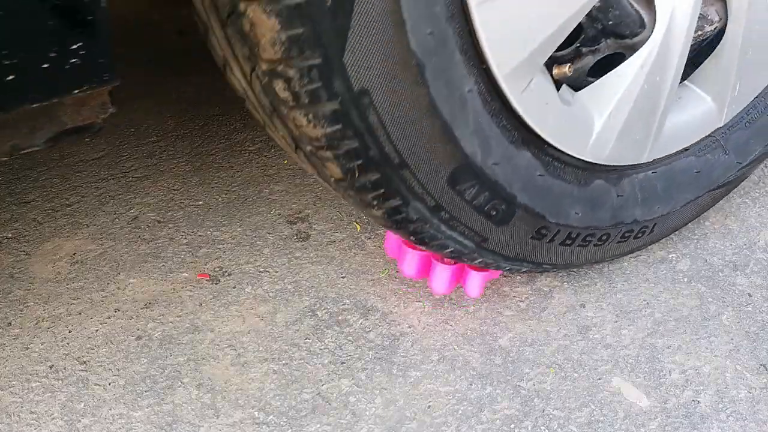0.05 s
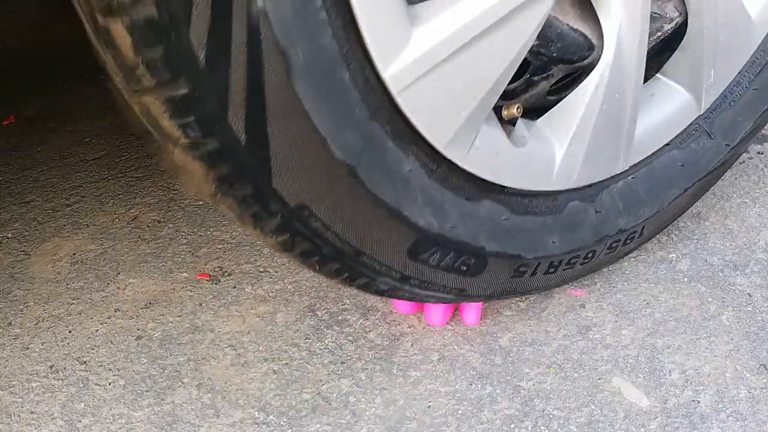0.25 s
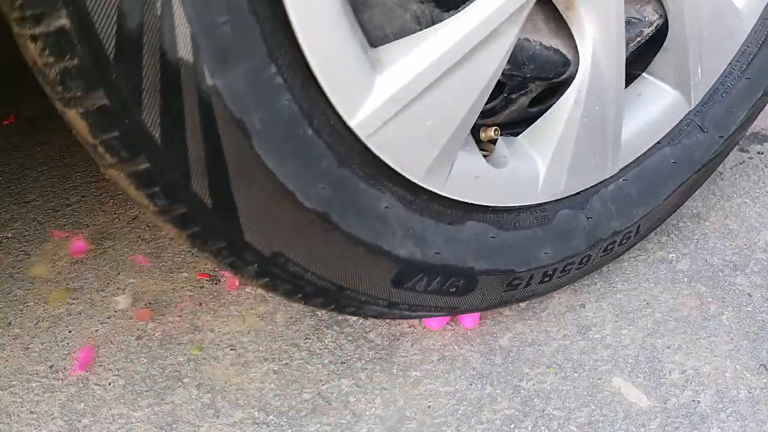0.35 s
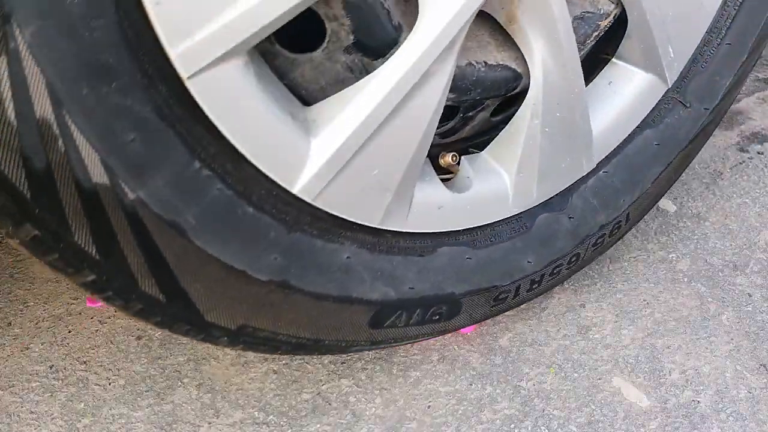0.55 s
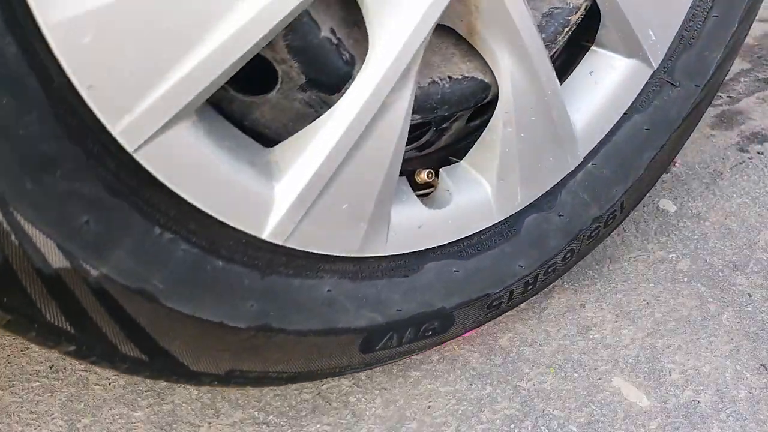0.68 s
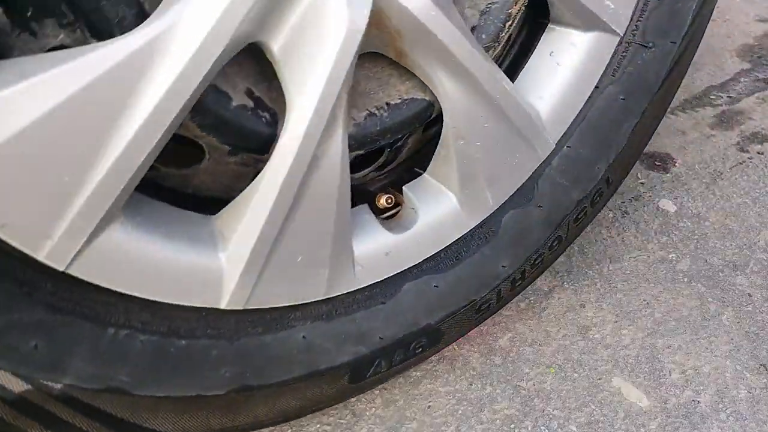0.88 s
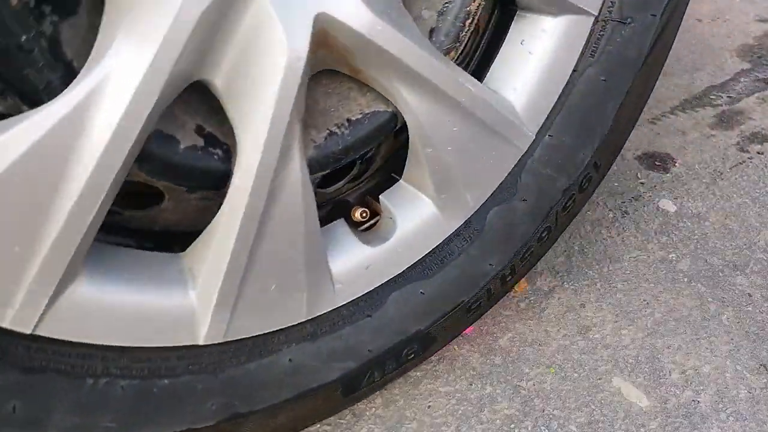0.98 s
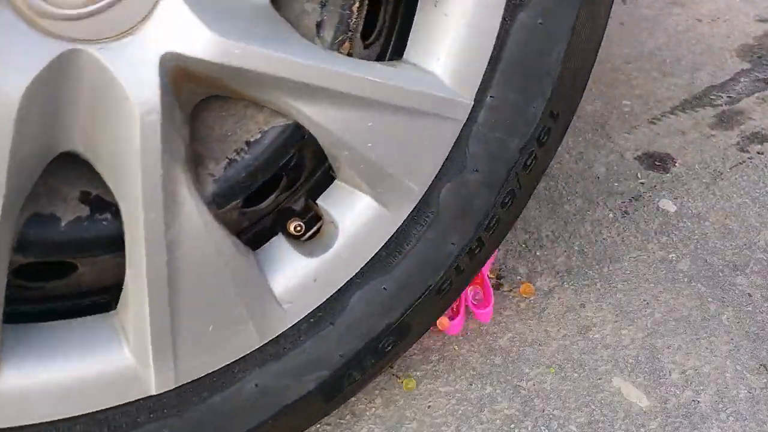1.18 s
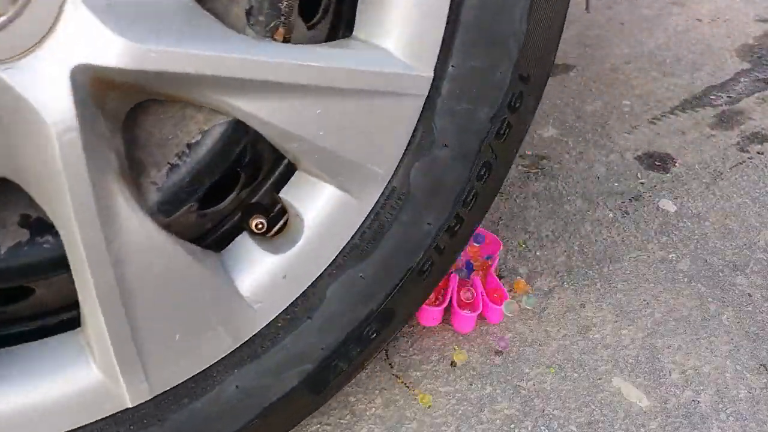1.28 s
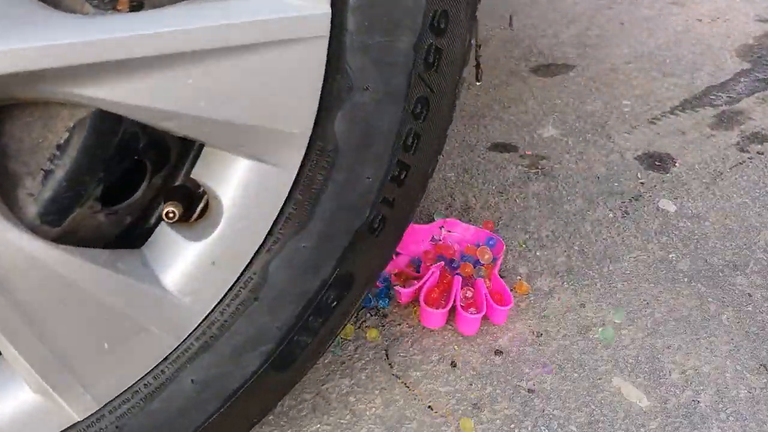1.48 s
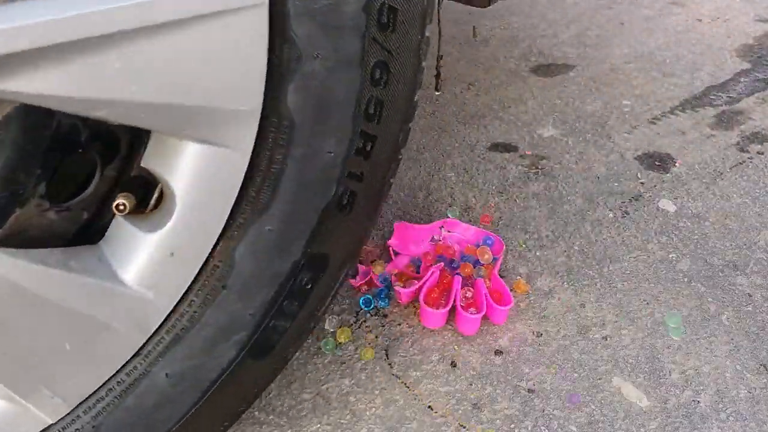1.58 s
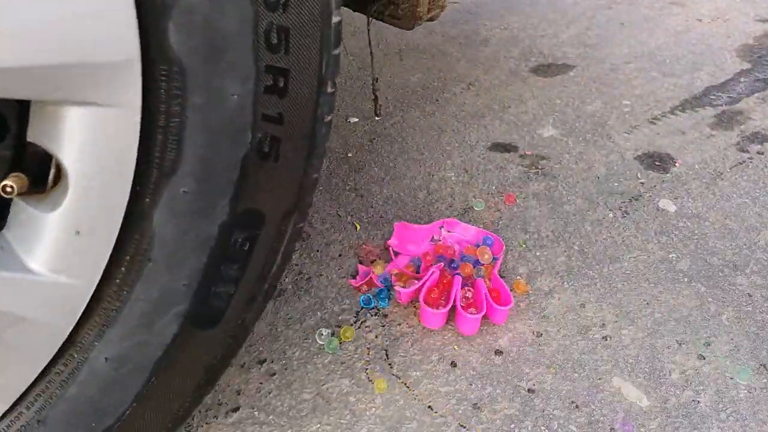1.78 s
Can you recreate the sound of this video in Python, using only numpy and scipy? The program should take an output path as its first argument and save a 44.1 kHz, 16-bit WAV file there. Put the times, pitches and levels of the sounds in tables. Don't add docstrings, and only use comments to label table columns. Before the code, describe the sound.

A car tyre crushes a brittle hollow plastic toy on concrete with loud cracks and snaps

```python
import sys
import numpy as np
from scipy import signal
from scipy.io import wavfile

SR = 44100
rng = np.random.default_rng(int(sys.argv[2]) if len(sys.argv) > 2 else 0)


def field_ratio(decibels):
    return 10 ** (np.asarray(decibels, dtype=float) / 20)


def unload_wav(signal):
    wavfile.write(
        sys.argv[1],
        SR,
        np.round(np.clip(np.atleast_2d(signal).T, -1, 1) * 32767).astype(np.int16),
    )


N = 81585

# (time [s], peak [dB], shard pitch [Hz], rattle [dB], sizzle [dB])
CRUSH_SNAPS = [(0.0716, -10.5, 1700, -21, -35), (0.2303, -2, 3100, -11, -10), (0.2449, -7, 2500, -6, -15),
               (0.2762, -6, 2730, -17, -19), (.2830, -6, 3270, -30.5, -15.5), (0.3113, -17, 3900, -25, -16),
               (0.3197, -14, 2740, -18, -32), (0.3535, -26.5, 3430, -6.5, -26),
               (.4165, -2.5, 3300, -9.5, -18), (0.424, -9.5, 2500, -15, -11),
               (0.5009, -6.5, 4470, -21.5, -7.5), (0.5887, -23, 6400, -19, -19),
               (0.6073, -5, 2440, -16, -12.5)]
# (time [s], peak [dB], shard pitch [Hz], rattle [dB], sizzle [dB])
SPLINTER_SNAPS = [(0.7502, -37.5, 4030, -14, -15), (0.7801, -37.5, 3130, -21, -22),
                  (0.8371, -21.5, 3620, -22.5, -16), (0.8816, -39, 1460, -16, -12),
                  (0.8951, -33.5, 1830, -17, -10), (0.9268, -30, 1360, -11, -16),
                  (0.9313, -20.5, 1700, -20.5, -25), (1.027, -15, 3700, -15.5, -11.5),
                  (1.0416, -36, 2700, -17, -25), (1.07, -38, 2750, -17, -30),
                  (1.0894, -39.5, 3450, -27, -24), (1.1128, -47, 1900, -2.5, -18),
                  (1.1919, -47.5, 2730, -4, -22), (1.2303, -34, 4610, -26, -24),
                  (1.2377, -38.5, 2330, -18, -28), (1.246, -37.5, 2560, -15, -27),
                  (1.3598, -51.5, 3970, -11, -19), (1.5576, -47, 3710, -16, -19)]
# (time [s], peak [dB], pitch [Hz], rattle [dB])
SHELL_KNOCKS = [(.231, -5.5, 580, -30), (.246, -8, 640, -35), (.320, 0.5, 704, -14),
                (.411, -23.5, 558, -29), (0.4171, 0, 730, -11), (.424, -7, 806, -6.5),
                (.5015, -26, 1110, -8), (0.588, -24.5, 1080, -12), (0.6079, -4.5, 908, -16.5),
                (.9268, -33, 1190, -16), (0.9307, -27, 1580, -14), (.937, -43, 960, -24),
                (1.0267, -15.5, 766, -9), (1.042, -36, 600, -18), (1.193, -43.5, 950, -8)]
# (time [s], hold [s], bright level [dB], hollow level [dB], T60 [s])
COLLAPSES = [
    (0.2303, 0.018, -14, -20, 0.11),
    (0.257, 0.006, -20.5, -20.5, 0.31),
    (0.357, 0.012, -36.5, -62, 0.27),
    (0.4186, 0.015, -24.5, -18, 0.13),
    (1.066, 0.032, -53.5, -61, .1),
    (1.208, 0.043, -55.5, -75, .1),
]
# (frequency [Hz], density [dB per Hz])
FRACTURE_SPECTRUM = [(200, -25), (330, -0.5), (700, -9.5), (1500, 0.5), (3700, -3), (6000, -13),
                     (9000, -19.5), (16000, -35)]
# (frequency [Hz], level [dB], T60 [s])
SHELL_MODES = [(476, -0.5, 0.022), (640, -0.5, 0.016), (760, -7, 0.016), (905, 1.5, .02)]
# (time [s], air ring [dB], carcass thud [dB])
TYRE_JOLTS = [
    (0.063, -30, -37),
    (0.233, -23, -22.5),
    (0.249, -29, -23),
    (0.2594, -6, -12),
    (0.2739, -8, -21.5),
    (.420, -31.5, -24),
    (.4435, -17, -24.5),
]
# (frequency [Hz], level [dB], T60 [s])
AIR_RING_MODES = [(227, -2.5, 0.54), (458.5, -20, .3)]
# (frequency [Hz], level [dB], T60 [s])
CARCASS_MODES = [(65, -9, 0.04), (119, -9.5, .1), (152, 4, 0.065)]
# (time [s], grit [dB], rumble [dB])
ROLL_LEVELS = [(0.0, -34.5, -29.5), (0.18, -38, -32.5), (0.35, -39.5, -29.5), (0.422, -41, -30),
               (0.534, -45.5, -40), (0.628, -46.5, -40), (0.73, -54, -44), (0.936, -58, -47),
               (1.282, -61, -48.5), (1.478, -60.5, -48.5), (1.85, -56.5, -49.5)]
# (frequency [Hz], density [dB per Hz])
GRIT_SPECTRUM = [(200, -23), (330, -2.5), (700, -1), (1200, -6), (3600, -6), (5500, -12.5), (8000, -31),
                 (16000, -35)]
# (frequency [Hz], density [dB per Hz])
RUMBLE_SPECTRUM = [(22, -7), (38, -12), (52, -16), (66, 5), (130, 0.5), (240, -4), (280, -15.5),
                   (400, -28.5)]
# (frequency [Hz], width [Hz], share [1])
PORT_BANDS = [(5000, 2600, .45), (14200, 4600, .4)]


def rms_one(x):
    return x / np.sqrt(np.mean(x ** 2) + 1e-20)


def top_one(x):
    return x / np.max(np.abs(x))


def drift(rate_hz):
    return np.interp(np.arange(N) * rate_hz / SR, np.arange(400), rng.standard_normal(400))


def band(x, low_hz, high_hz):
    edges_hz = [low_hz, min(high_hz, 0.45 * SR)]
    return signal.sosfilt(signal.butter(2, edges_hz, "band", fs=SR, output="sos"), x)


def ring(clicks, hz, t60_s):
    r, w = field_ratio(-60 / (t60_s * SR)), 2 * np.pi * hz / SR
    return signal.lfilter([0, np.sin(w)], [1, -2 * r * np.cos(w), r * r], clicks + 1e-18)


def grains(per_s, spread_db):
    hits = rng.random(N) < per_s / SR
    size = field_ratio(spread_db * np.minimum(rng.exponential(1, N), 4))
    return hits * size * rng.choice([-1, 1], N)


def coloured(x, spectrum, patchy_db, tilt_db=0):
    hz, db = np.transpose(spectrum)
    edges_hz = hz[0] * 2 ** np.arange(0, np.log2(hz[-1] / hz[0]) + 0.2, 1 / 3)
    out = 0
    for k, (low_hz, high_hz) in enumerate(zip(edges_hz, edges_hz[1:])):
        mid_hz = np.sqrt(low_hz * high_hz)
        gain_db = np.interp(np.log(mid_hz), np.log(hz), db) + patchy_db * drift(18)
        gain_db = gain_db + tilt_db * max(0, min(0.6, np.log2(mid_hz / 7500)))
        settled = band(np.tile(x[k % len(x)], 2), low_hz, high_hz)[N:]
        out = out + field_ratio(gain_db) * settled
    return rms_one(out)


def snaps():
    crack_s, arrival_s, rise_s = 0.0005, 0.0009, 0.00067
    shard_t60_s, rattle_t60_s, sizzle_t60_s = 0.006, 0.066, 0.036
    out, t = np.zeros(N + SR), np.arange(SR // 6) / SR
    for s, peak_db, hz, rattle_db, sizzle_db in CRUSH_SNAPS + SPLINTER_SNAPS:
        white, tail = rng.standard_normal((2, len(t)))
        white[0] = -7.0
        crack = white * np.exp(-t / crack_s)
        late = field_ratio(rattle_db) * np.minimum(t / rise_s, 1)
        age_s = t * (hz / 2500) ** 0.59

        body = top_one(band(band(crack, hz / 2.6, hz * 1.69), hz / 2.6, hz * 3.1))
        shard = top_one(body + 0.5 * top_one(ring(crack, hz, shard_t60_s)))
        rattle = rms_one(band(tail, hz / 2.01, hz * 1.99))
        shard += rattle * late * field_ratio(-60 * age_s / rattle_t60_s)

        sizzle_tail = rms_one(band(tail, 4200, 14000)) * late
        sizzle_tail *= field_ratio(-6.5 - 60 * age_s / sizzle_t60_s)
        sizzle = top_one(band(crack, 4600, 16500)) + sizzle_tail

        i = int((s + arrival_s) * SR)
        out[i:i + len(t)] += field_ratio(peak_db) * (shard + field_ratio(sizzle_db + 11) * sizzle)
    return out[:N]


def knocks():
    knock_t60_s, rattle_t60_s, rise_s, trim_db = 0.0074, 0.08, 0.009, -1
    out, t = np.zeros(N + SR), np.arange(SR // 6) / SR
    pull = band(np.exp(-((t - 0.0005) / 0.00015) ** 2), 330, 4000)
    for s, peak_db, hz, rattle_db in SHELL_KNOCKS:
        rattle = rms_one(band(rng.standard_normal(len(t)), 440, 1300))
        rattle *= np.minimum(t / rise_s, 1) * field_ratio(rattle_db - 60 * t / rattle_t60_s)
        i = int(s * SR)
        out[i:i + len(t)] += field_ratio(peak_db + trim_db) * (top_one(ring(pull, hz, knock_t60_s)) + rattle)
    return out[:N]


def crunches():
    t = np.arange(N) / SR
    breaks = grains(per_s=6000, spread_db=3.5)
    bright = coloured(breaks * rng.choice([-1, 1], (2, N)), FRACTURE_SPECTRUM, patchy_db=2.0)
    hollow = rms_one(sum(field_ratio(db) * ring(grains(5000, 2.2), hz, t60_s) for hz, db, t60_s in SHELL_MODES))
    out = 0
    for s, hold_s, bright_db, hollow_db, t60_s in COLLAPSES:
        shape = (t >= s) * field_ratio(-60 * np.clip(t - s - hold_s, 0, 1) / t60_s)
        out = out + shape * (field_ratio(bright_db) * bright + field_ratio(hollow_db) * hollow)
    return out


def tyre():
    out = 0
    for column, modes in ((1, AIR_RING_MODES), (2, CARCASS_MODES)):
        clicks = np.zeros(N)
        for jolt in TYRE_JOLTS:
            clicks[int(jolt[0] * SR)] = field_ratio(jolt[column])
        out = out + sum(field_ratio(db) * ring(clicks, hz, t60_s) for hz, db, t60_s in modes)
    soft = np.hanning(40)
    return signal.lfilter(soft / soft.sum(), 1, out)


def rolling():
    time_s, *levels_db = np.transpose(ROLL_LEVELS)
    grit_db, rumble_db = [np.interp(np.arange(N) / SR, time_s, db) for db in levels_db]
    bed = rng.standard_normal((2, N)) + field_ratio(-6.5) * rms_one(grains(per_s=1600, spread_db=4.7))
    tilt_db = 0.41 * (grit_db - grit_db.min())
    grit = coloured(bed, GRIT_SPECTRUM, patchy_db=1.5, tilt_db=tilt_db)
    grit = signal.sosfilt(signal.cheby2(10, 40, 16400, fs=SR, output="sos"), grit)
    rumble = coloured(rng.standard_normal((2, N)), RUMBLE_SPECTRUM, patchy_db=1.5)
    return field_ratio(grit_db + 0.5 + 0.86 * drift(25)) * grit + field_ratio(rumble_db - 2.5) * rumble


def scene():
    return np.tile(snaps() + knocks() + crunches() + tyre() + rolling(), (2, 1))


def low_pass(x):
    return signal.sosfilt(signal.butter(12, 16860, fs=SR, output="sos"), x)


def record(dry):
    bass_cut_hz, top_cut_hz = 26, 16900
    x = dry + field_ratio(-2.5) * band(dry, 12000, 15100)
    x = np.tanh(x)
    x = signal.sosfilt(signal.butter(2, bass_cut_hz, "high", fs=SR, output="sos"), x)
    uneven = sum(share * band(x[0], hz - width_hz / 2, hz + width_hz / 2) for hz, width_hz, share in PORT_BANDS)
    x = x + uneven * [[-0.5], [0.5]]
    mix = signal.sosfilt(signal.cheby2(12, 60, top_cut_hz, fs=SR, output="sos"), x)
    return low_pass(mix)


dry = scene()
out = record(dry)
unload_wav(out)
```